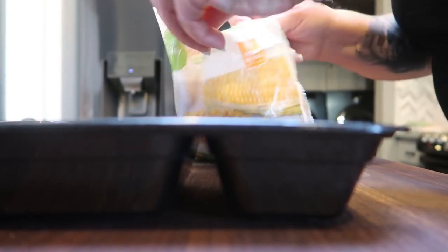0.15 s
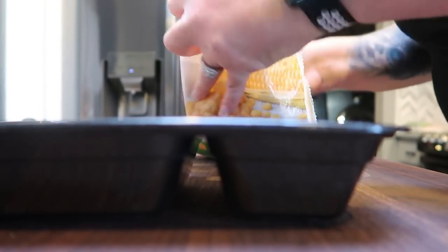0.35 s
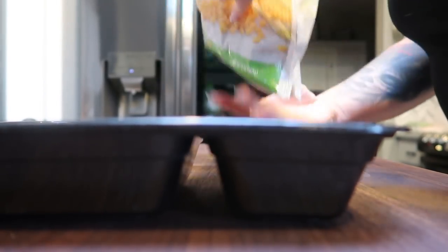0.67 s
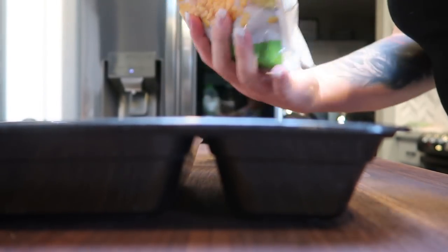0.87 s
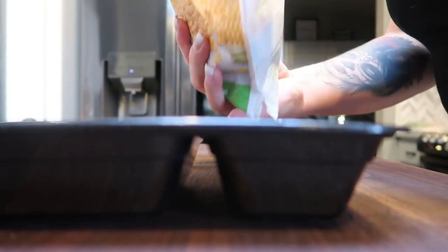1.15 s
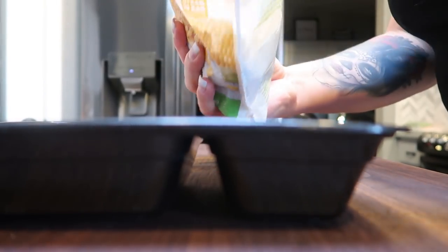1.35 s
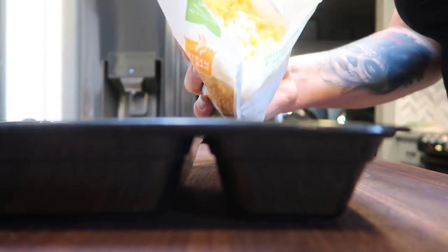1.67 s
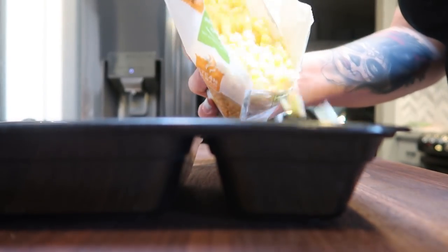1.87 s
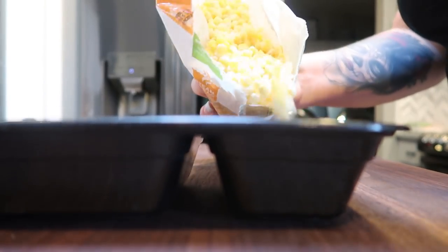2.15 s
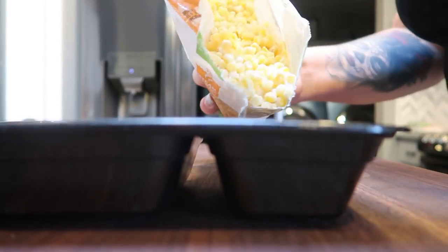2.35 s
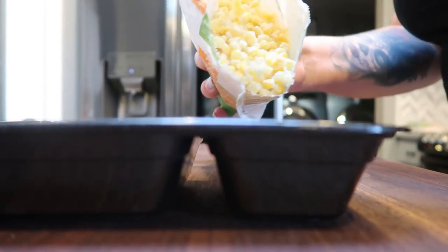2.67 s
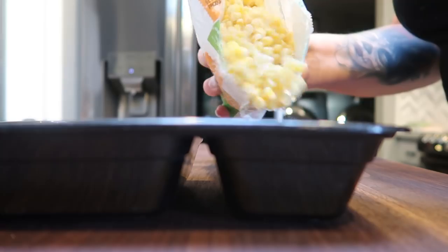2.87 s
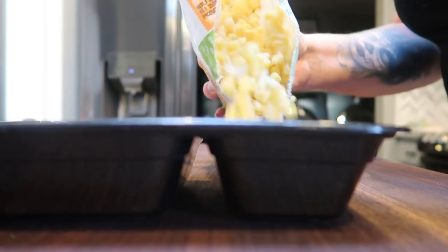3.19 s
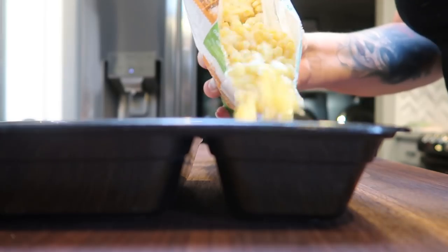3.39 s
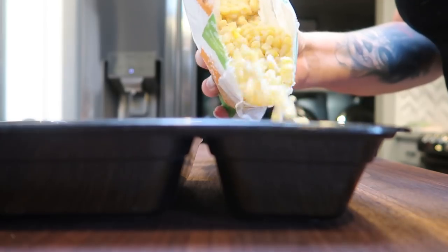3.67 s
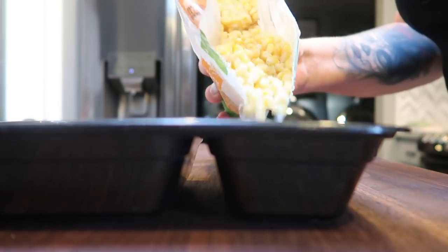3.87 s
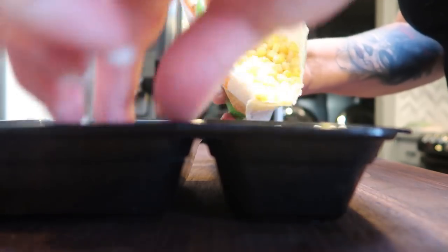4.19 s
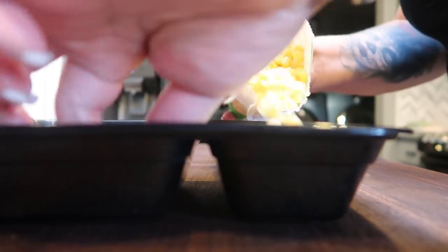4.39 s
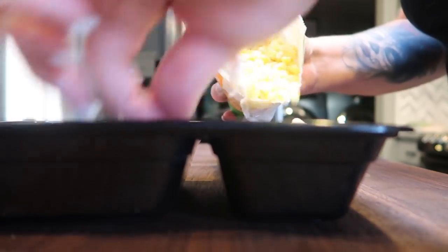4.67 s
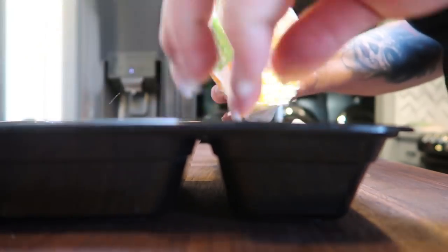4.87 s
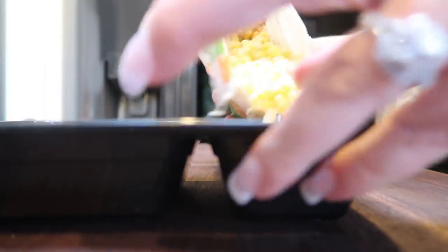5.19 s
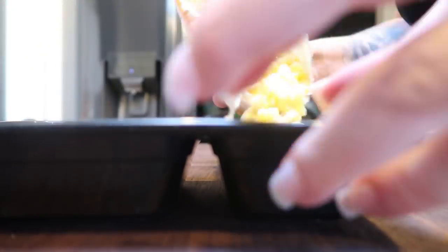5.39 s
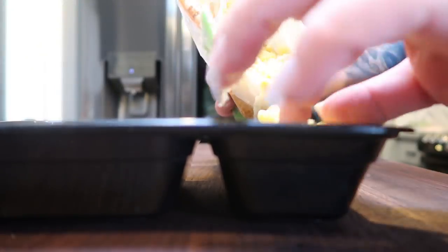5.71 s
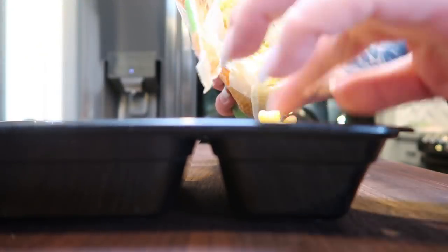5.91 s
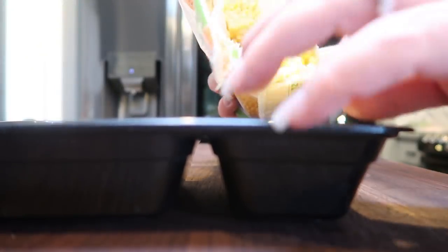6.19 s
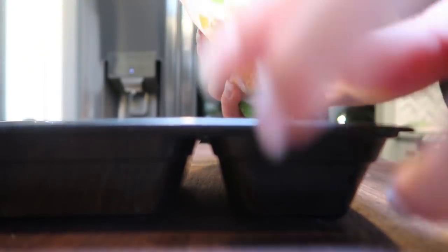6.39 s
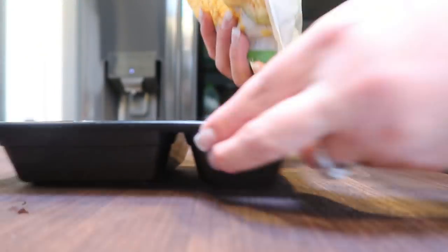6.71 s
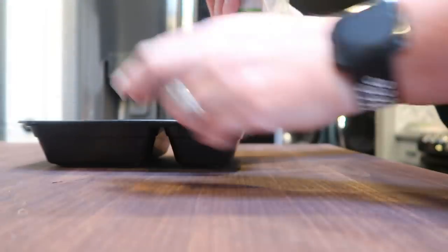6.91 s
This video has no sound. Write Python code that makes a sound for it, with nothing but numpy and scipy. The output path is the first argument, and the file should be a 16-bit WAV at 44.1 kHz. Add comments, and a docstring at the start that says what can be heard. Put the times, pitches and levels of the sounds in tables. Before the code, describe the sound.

Crackling film and dull shifting frozen kernels, then clattering pours into a thin plastic tray, raking hiss, and a final scrape with brief squeaks on the counter.

```python
"""At a kitchen counter, a hand lifts and tips a plastic bag of frozen corn, and the kernels rain into a thin tray.
In the bag, a swarm of dull rings makes the grinding; the film crinkles in bright rings and puffs of noise.
In the tray, each kernel is a short ring plus a puff of noise; stirred corn, and later the scraping tray, hisses.
The counter rumbles, bumps and squeaks, the kitchen answers with a soft noise tail, and steady hum and hiss lie below."""
import sys
import numpy as np
from scipy import signal
from scipy.fft import rfft, irfft, next_fast_len
from scipy.io import wavfile

SR = 44100
rng = np.random.default_rng(int(sys.argv[2]) if len(sys.argv) > 2 else 0)


def put_to_file(sound):
    """Save the sound as 16-bit audio at rate SR, in the file named by the first command-line argument."""
    columns = np.atleast_2d(sound).T  # one column per channel
    safe = np.clip(columns, -1, 1)
    whole_steps = np.round(safe * 32767)
    wavfile.write(sys.argv[1], SR, whole_steps.astype(np.int16))


N = 310905  # length in samples

EMPTY_HZ, FULL_HZ = 588, 283  # bass corner of the tray, empty and filled
FULL_S = 3.43  # time when the filled sound has taken over


def tray():
    """Kernels strike a hollow tray, which radiates little bass below a corner that is lower once it fills."""
    rattle_db, hiss_db = rattle_level()
    rattle, patter = small_kernels(rattle_db, hiss_db - rattle_db)
    blows, hollow = loud_kernels()
    # kernels come in clumps, so the level wanders
    clump_times = np.arange(0, N, 700)
    clumps_db = 1.74 * np.interp(np.arange(N), clump_times, rng.standard_normal(N // 700 + 1))
    wall = amp(rattle_db + clumps_db - 0.5) * rattle + blows
    empty = filtered(wall, lambda hz: bass_cut(hz, EMPTY_HZ, 4))
    full = filtered(wall, lambda hz: bass_cut(hz, FULL_HZ, 4))
    # fade from the empty sound to the full one, starting at the first loud kernel
    first_s = LOUD_KERNELS[0][0]
    fill = np.clip((np.arange(N) / SR - first_s) / (FULL_S - first_s), 0, 1) ** 2
    air_inside = hollow + amp(rattle_db + PATTER_DB) * patter
    return (1 - fill) * amp(3.0) * empty + fill * full + air_inside


# ringing of the tray wall: ratio to pitch, level_db, time to fall 60 dB in s (before shortening by the corn)
TRAY_MODES = [(.33, -25.5, .03), (.55, -15, 0.015), (1, 2, 0.011), (1.3, 2.5, 0.0044),
              (1.898, -2.5, 0.0051), (2.7, -12, 0.0026)]
# bare plastic rings at one pitch, a bed of corn at many and more briefly:
# time_s, pitch_hz, share of the pitch scatter, share of the ringing time
CORN_BED = [(3.4, 1470, 0.092, 1), (4.0, 1635, 0.2, 0.54)]
# air in the tray: ratio to pitch, level_db, time to fall 60 dB in s
HOLLOW_MODES = [(1, 4.5, 0.044)]
HOLLOW_HZ, FILL_DB_PER_S = 505, 6.5  # pitch of that air, and how fast it fades as the tray fills
HOLLOW_DB, PATTER_DB = -24, -23  # level of that air relative to the loud kernels, and to the rattle


def small_kernels(rattle_db, bright_db):
    """Thousands of small kernels knock on the wall and hiss, while the air in the tray patters."""
    s, db, hz = swarm(1.8, 7.05, count=6500, spread_db=3.5, hz=1, scatter=0.95)
    at, centre_hz, scatter_share, life = np.transpose(CORN_BED)
    hz = np.interp(s, at, centre_hz) * hz ** np.interp(s, at, scatter_share)

    # a louder pour is a denser one; in a sparse one each kernel stands out more
    busy = np.clip((rattle_db[(s * SR).astype(int)] + 42.5) / 20, .18, 1)
    kept = rng.random(len(s)) < busy ** 2
    s, db, hz = s[kept], (db - 10 * np.log10(busy))[kept], hz[kept]

    hollow_hz = np.full(len(s), HOLLOW_HZ)
    patter = unit(ring(s, db - FILL_DB_PER_S * s, hollow_hz, HOLLOW_MODES,
                       size=2200, attack=0.0011, detune=0.043))
    knocks = unit(ring(s, db, hz, TRAY_MODES, size=700, attack=0.00047, detune=0.043,
                       life=np.interp(s, at, life)))
    clicks = unit(crack(s, db, 0.017))
    # hiss of sliding corn, and near the end of the tray scraping over the counter
    s, db, _ = swarm(1.98, 7.05, count=6000, spread_db=4, hz=1, scatter=0)
    hiss = unit(crack(s, db, 0.02))
    return knocks + amp(bright_db - 12) * (clicks + hiss), patter


# loud kernels on the tray: start_s, level_db (relative), pitch_hz
LOUD_KERNELS = [(2.032, -3.5, 1670), (2.041, -14, 1720), (2.079, 1, 1715), (2.083, -2.5, 1620),
                (2.095, -21, 1820), (2.098, -11, 1430), (2.12, -7, 2530), (2.137, -5, 1300),
                (2.157, -25, 1470), (2.189, -22, 1450), (2.208, -11, 1170), (2.211, -7, 1490),
                (2.252, -2.5, 1350), (2.264, -13, 1950), (2.326, -15, 1800), (2.359, -6.5, 1490),
                (2.464, -12, 1540), (2.543, -16.5, 1550), (2.838, -27, 1800), (2.901, -26, 2000),
                (2.944, -8.5, 1630), (3.033, -6.5, 1470), (3.039, 0, 1420), (3.106, -5.5, 1380),
                (3.112, -10, 1550), (3.136, -5, 1420), (3.142, -7.5, 1740), (3.195, -6, 1360),
                (3.264, -5.5, 1710), (3.375, -9.5, 1390), (3.392, -12, 1470), (3.522, -7, 1740),
                (3.599, -4, 1575), (3.634, -10.5, 1480), (3.802, -6, 1450), (3.824, -17, 1480),
                (3.833, -19, 1460), (3.865, -13.5, 2950), (3.876, -14, 1610), (3.927, -12, 1440),
                (4.073, -13, 1750), (4.16, -12.5, 2210), (4.246, -11, 2470), (4.256, -10.5, 1430),
                (4.326, -5, 1520), (4.392, -14.5, 1010), (4.487, -14.5, 1440), (4.575, -16, 2070),
                (4.616, -10, 870), (4.719, 1.5, 1394), (4.791, -16, 1260), (4.873, -16, 1750),
                (4.941, -4, 1860), (5.177, -13.5, 2100), (5.179, 0.5, 1050), (5.226, -12.5, 1040),
                (5.383, 0, 1830), (5.397, -2.5, 1440), (5.448, -16, 1840), (5.504, 4, 1700),
                (5.524, -11, 1320), (5.68, -10.5, 1180), (5.696, -7.5, 1090), (6.193, -7, 1120),
                (6.296, -16.5, 1800), (6.306, -18, 2510), (6.397, -19, 1290), (6.482, -24, 2860),
                (6.653, -14.5, 1210), (6.691, -13, 1260), (6.785, -1, 1674), (6.962, -9.5, 1290),
                (6.984, -17, 1380)]
# how sharply the kernels click as they land, changing through the pour:
# time_s, crack over ring in dB (relative)
CLICK_SHARPNESS = [(2.15, -1), (2.4, -4.5), (3.75, -19), (3.87, -1.5), (4.6, -8), (4.72, -6), (5.2, -13.5),
                   (5.7, -2.5), (6.2, -8.5), (6.65, 1), (7.05, -13.5)]


def loud_kernels():
    """Each loud kernel rings the wall, cracks on contact and sets off the air in the tray."""
    s, db, hz = np.transpose(LOUD_KERNELS)
    at, _, _, life = np.transpose(CORN_BED)
    blows = ring(s, db + 3.0, hz, TRAY_MODES, size=700, attack=0.00041, detune=0.061,
                 life=np.interp(s, at, life))
    sharpness_db = np.interp(s, *np.transpose(CLICK_SHARPNESS))
    blows = blows + crack(s, db + sharpness_db + 1.5, 0.011)
    hollow_db = db + HOLLOW_DB - FILL_DB_PER_S * (s - s[0])
    hollow = ring(s, hollow_db, np.full(len(s), HOLLOW_HZ), HOLLOW_MODES,
                  size=2200, attack=0.0036, detune=0.022)
    return blows, hollow


# rushes of kernels, shaken out of the bag or stirred by fingers, and near the end the tray scraping:
# peak_s, rattle level_db (relative), rise_s for 20 dB, hiss over rattle in dB (relative)
RUSHES = [(2.097, -35, 0.029, -1), (2.206, -33.5, 0.99, -3), (2.446, -29.5, .4, 3), (2.529, -35, 0.098, 8),
          (2.7, -44, 1, -2.5), (2.944, -32.5, 0.0088, 7), (3.041, -29, 0.044, 5), (3.144, -21.5, 0.077, 4),
          (3.278, -24.5, 0.12, 5.5), (3.39, -28, 0.36, 2.5), (3.53, -30.5, 0.43, 7), (3.649, -29, 0.48, 3),
          (3.88, -30.5, 0.24, -1), (3.97, -33, .15, 7.5), (4.151, -31, 0.23, 7.5), (4.25, -34, 0.17, -8),
          (4.45, -41.5, 0.36, 9), (4.679, -31.5, 1, 1.5), (4.79, -37, .15, 0), (4.969, -38.5, 0.49, 7.5),
          (5.136, -28, 0.0086, 7.5), (5.179, -31.5, 0.052, -8), (5.29, -39, 0.18, 12.5),
          (5.39, -27, 0.036, 5), (5.56, -35.5, 0.9, 4.5), (5.691, -34.5, .4, -7), (5.887, -36, 0.73, 10),
          (6.076, -22, 0.0069, 4.5), (6.139, -27.5, 0.066, 4), (6.23, -42, .1, 11), (6.32, -35.5, 0.21, 5),
          (6.55, -47.5, 0.39, 11.5), (6.68, -35, 0.28, 10), (6.788, -35.5, 0.019, 13),
          (6.91, -53, 0.31, 25), (6.97, -31.5, 0.05, 5.5), (7.02, -35.5, .1, 13)]
RUSH_FALL_DB_PER_S = 127
QUIET_DB = -56  # the rattle and hiss levels never go below this


def rattle_level():
    """How strongly the tray rattles with knocking corn and how strongly it hisses, both in dB."""
    s, db, rise_s, hiss_db = np.transpose(RUSHES)
    rattle_db = swells(s, db, rise_s, RUSH_FALL_DB_PER_S)
    hiss_db = swells(s, db + hiss_db, rise_s, RUSH_FALL_DB_PER_S)
    return np.maximum(rattle_db, QUIET_DB), np.maximum(hiss_db, QUIET_DB)


# squeezes of the bag: peak_s, grinding level_db (relative), rise_s for 20 dB, film over grinding in dB (relative)
SQUEEZES = [(0.0, -29.5, .05, 4), (0.139, -21.5, 0.036, -7), (0.187, -27.5, 0.11, 3.5),
            (0.3, -31, 0.067, -3.5), (0.45, -36, 0.027, 2), (0.54, -28.5, 0.17, -2.5),
            (0.733, -34.5, 0.94, -2.5), (0.916, -32, 0.12, -1.5), (0.982, -26, 0.063, -8),
            (1.306, -26.5, 0.13, -4.5), (1.453, -27, 0.14, -7), (1.555, -25, 0.047, -6.5),
            (1.75, -40, 1, -0.5), (1.842, -26, 0.17, -4), (1.944, -30.5, 0.66, -3)]
SQUEEZE_FALL_DB_PER_S = 178
# loud creases of the bag: start_s, level_db (relative), pitch_hz
CREASES = [(0.0084, -7, 4300), (0.0338, -7, 1770), (0.1115, -12, 1190), (0.1356, -3.5, 1400),
           (0.1912, -7, 1970), (0.28, -11, 1290), (0.3003, -13, 3610), (0.389, -19.5, 1170),
           (0.444, -16.5, 1680), (0.502, -12.5, 2100), (0.554, -20, 2230), (0.605, -13.5, 2000),
           (0.819, -19, 2120), (0.9699, -15, 2600), (0.9785, -11.5, 3030), (1.2846, -13.5, 3130),
           (1.3201, -13, 2830), (1.432, -19, 2880), (1.46, -12.5, 3110), (1.47, -14.5, 2580),
           (1.5423, -8.5, 1240), (1.611, -7, 2810), (1.7519, -9.5, 1320), (1.823, -12, 1220),
           (1.8674, -14.5, 1340), (1.8927, -6, 2170), (1.9052, -3.5, 2160), (1.9884, -14, 2720)]
# ringing of the plastic film: ratio to pitch, level_db, time to fall 60 dB in s
FILM_MODES = [(.6, -8, 0.012), (0.999, 1.5, 0.01), (1.5, -4, 0.0048)]
# dull ringing of a heavy load, also used for the counter: ratio to pitch, level_db, time to fall 60 dB in s
LOAD_MODES = [(0.601, -9, 0.0038), (1.001, 0.5, 0.018), (1.699, 9, 0.012)]
THUMP_DB = 7  # a crease jolts the kernels: level over the grinding load


def bag():
    """Frozen kernels grind dully in the bag while the film crackles and creases."""
    s, db, rise_s, film_db = np.transpose(SQUEEZES)
    load_db = swells(s, db, rise_s, SQUEEZE_FALL_DB_PER_S)
    film_db = swells(s, db + film_db, rise_s, SQUEEZE_FALL_DB_PER_S)

    kernels = swarm(0, 2.1, count=2000, spread_db=3.5, hz=370.4, scatter=0.448)
    grind = unit(ring(*kernels, LOAD_MODES, size=1000, attack=0.001))

    s, db, hz = swarm(0, 2.1, count=1300, spread_db=2.5, hz=2264, scatter=0.411)
    crinkle = unit(ring(s, db, hz, FILM_MODES, size=350))
    crinkle = crinkle + amp(0.5) * unit(crack(s, db, 0.008, tilt_db=6))

    s, db, hz = np.transpose(CREASES)
    creases = ring(s, db - 5.0, hz, FILM_MODES, size=350, detune=0.027)
    # higher creases crack harder
    creases = creases + crack(s, db + 5 * np.log2(hz / 2000), 0.0093, tilt_db=5.5)
    thump_db = load_db[(s * SR).astype(int)] + THUMP_DB
    thumps = ring(s, thump_db, np.full(len(s), 450), LOAD_MODES, size=1000, attack=0.0014)
    return amp(load_db - 3.0) * grind + amp(film_db - 4.0) * crinkle + creases + thumps


# hands and tray rumble on the counter: time_s, level_db while the corn is quiet
HANDS = [(2.0, -38.5), (2.2, -63.5), (4.1, -56), (4.4, -50.5), (6.3, -52), (6.6, -46.5), (7.05, -44.5)]
RUMBLE_SLOPE = 0.44  # dB of rumble per dB of rattle
# the tray bumping on the counter: start_s, level_db (relative)
BUMPS = [(4.324, -22), (4.665, -22.5), (5.179, -20), (6.786, -24)]
# the tray squeaks as it is pushed over the counter: start_s, level_db (relative), pitch_hz
SQUEAKS = [(6.849, -17, 3930), (6.891, -12.5, 3180)]
# ringing of a squeak: ratio to pitch, level_db, time to fall 60 dB in s
SQUEAK_MODES = [(0.98, 5.5, 0.012), (0.64, -10, 0.018)]


def counter():
    """Hands and tray rumble as a swarm of low rings, with a few firm bumps and squeaks."""
    grains = swarm(1.98, 7.05, count=7000, spread_db=1.1, hz=179.0, scatter=0.646)
    rumble = unit(ring(*grains, LOAD_MODES, size=700, attack=0.0013))
    at, hands_db = np.transpose(HANDS)
    # silent outside the table
    hands_db = np.interp(np.arange(N) / SR, at, hands_db, -120, -120)
    rumble_db = hands_db + RUMBLE_SLOPE * (rattle_level()[0] - QUIET_DB)

    s, db = np.transpose(BUMPS)
    bumps = ring(s, db - .4, np.full(len(s), 220), LOAD_MODES, size=1500, attack=0.00061)
    squeaks = ring(*np.transpose(SQUEAKS), SQUEAK_MODES, size=700, attack=0.0025, detune=0.011)
    return squeaks + amp(rumble_db) * rumble + bumps


# how long the kitchen's answer lasts: pitch_hz, time to fall 60 dB in s
KITCHEN_DECAY = [(200, 0.062), (1500, 0.31), (10000, 0.27)]


def kitchen(x):
    """Each frequency of the room's answer dies at its own speed; mid and side get their own tails."""
    hz, t, z = signal.stft(rng.standard_normal((2, SR // 2)), SR, nperseg=256)
    fade_db = -60 * t / along(KITCHEN_DECAY, hz)[:, None]
    tail = signal.istft(z * amp(fade_db), SR, nperseg=256)[1]
    tail = tail / np.linalg.norm(tail[0])
    late = np.pad(x, (200, 0))[None]  # the answer starts 200 samples late
    return signal.fftconvolve(late, tail, axes=1)[:, :N]


# tone of the kitchen's hum and hiss: pitch_hz, level_db per Hz (relative)
AIR_TONE = [(18, -52), (30, -40), (245, 14.5), (988, 5), (2750, 4), (4650, -1), (16000, -40)]
AIR_DB = -53


def air():
    """The steady noise of the room: random noise shaped into hum and hiss."""
    noise = rng.standard_normal((2, N))
    return amp(AIR_DB) * unit(filtered(noise, lambda hz: amp(along(AIR_TONE, hz))))


def ring(s, db, hz, modes, size, attack=0.000072, detune=0.11, life=1):
    """Each blow rings the modes at new strengths and slightly new pitches; life scales the decay times."""
    t = np.arange(size) / SR
    chance = rng.standard_normal((len(s), len(modes), 2))
    life = np.reshape(life, (-1, 1))
    shapes = 0
    for k, (ratio, level_db, t60) in enumerate(modes):
        pitch = hz[:, None] * ratio * np.exp(detune * chance[:, k, :1])
        mode_db = level_db + 2.45 * chance[:, k, 1:] - 60 * t / (t60 * life)
        shapes = shapes + amp(mode_db) * np.sin(2 * np.pi * pitch * t)
    return lay(s, amp(db)[:, None] * shapes * (1 - np.exp(-t / attack)))


# tone of a hard contact: pitch_hz, level_db (before tilt)
CRACK_TONE = [(500, 6), (1500, 5.5), (3500, 1.5), (6500, -14.5), (8300, -21), (11000, -44), (13000, -39),
              (16000, -58)]


def crack(s, db, t60, tilt_db=0):
    """The hard contact itself: a fading puff of noise, with its treble raised by tilt_db."""
    t = np.arange(448) / SR
    noise = rng.standard_normal((len(s), len(t))).clip(-1.2, 1.2)
    puffs = amp(db[:, None] - 60 * t / t60) * noise
    return filtered(lay(s, puffs), lambda hz: amp(along(CRACK_TONE, hz) + tilt_db * np.log2(1 + hz / 4000)))


def swarm(t0, t1, count, spread_db, hz, scatter):
    """Random grains: times in s, levels in dB with a few far larger, pitches in Hz."""
    u = rng.random((count, 2))
    pitch = hz * np.exp(scatter * rng.standard_normal(count))
    return t0 + (t1 - t0) * u[:, 0], -spread_db * np.log(u[:, 1] + .015), pitch


def swells(s, db, rise_s, fall_db_per_s):
    """Level in dB of overlapping gestures: each climbs at its own pace and dies away at a common one."""
    grid = np.arange(0, N, 64)
    t = grid[None] / SR - s[:, None]
    climb_db = 20 * t / np.abs(rise_s)[:, None]
    each_db = db[:, None] + np.where(t < 0, climb_db, -fall_db_per_s * t)
    total_db = 10 * np.log10(np.sum(amp(2 * each_db), axis=0) + 1e-12)  # powers add up
    return np.interp(np.arange(N), grid, total_db)


def lay(s, shapes):
    """Rows of sound placed at times s: their sum, and a sum weighted by the direction each comes from."""
    where = (np.round(s * SR).astype(int)[:, None] + np.arange(shapes.shape[1])).ravel()
    aim = 0.58 + rng.standard_normal((len(s), 1))
    return np.array([np.bincount(where, (w * shapes).ravel(), N)[:N] for w in (1, aim)])


def amp(db):
    """Decibels to gain."""
    return 10 ** (np.asarray(db) / 20)


def unit(x):
    """Scaled so that the first row has rms 1."""
    return x / np.sqrt(np.mean(x[0] ** 2) + 1e-20)


def along(points, hz):
    """Reads a curve of (Hz, value) points on a log axis."""
    f, v = np.transpose(points)
    return np.interp(np.log(hz + 1), np.log(f + 1), v)


def bass_cut(hz, corner_hz, order):
    """Response of a filter that weakens everything below its corner."""
    return (1j * hz / (corner_hz + 1j * hz)) ** order


def filtered(x, response):
    """Sound x shaped by a response of frequency."""
    m = next_fast_len(N + 8192)
    return irfft(rfft(x, m) * response(np.fft.rfftfreq(m, 1 / SR)), m)[..., :N]


# difference between the two microphone ports: pitch_hz, side minus mid in dB (before direction weights)
PORTS = [(60, -32), (380, -20), (1000, -32.5), (2400, -20.5), (4400, -8), (8100, 0.5), (12000, 10)]


def scene():
    """Close ports hear the bass nearly alike; direction shows in the treble, a quarter cycle apart."""
    near = bag() + tray() + counter()
    mid, across = near + amp(-14) * kitchen(near[0]) + air()
    side = filtered(across, lambda hz: -1j * amp(along(PORTS, hz)))
    return np.array([mid + side, mid - side])


TOP_HZ = 16400  # band limit


def record(dry):
    """The microphone drops the deep bass; the loudest blows clip; nothing is kept above the band limit."""
    thin = filtered(dry, lambda hz: bass_cut(hz, 70, 3))
    clipped = thin / (1 + np.abs(thin / .97) ** 8) ** (1 / 8)
    return filtered(clipped, lambda hz: hz < TOP_HZ)


dry = scene()
out = record(dry)
put_to_file(out)
```